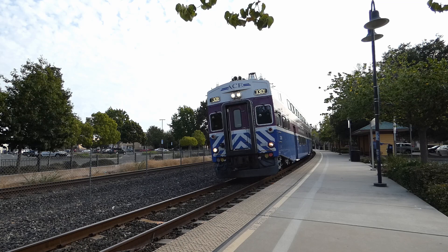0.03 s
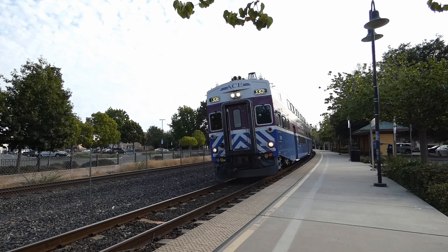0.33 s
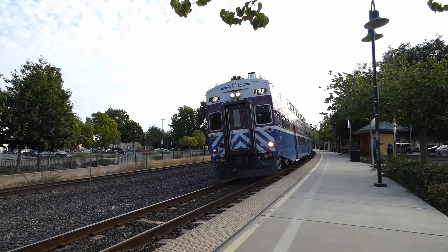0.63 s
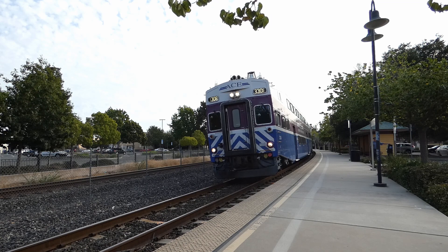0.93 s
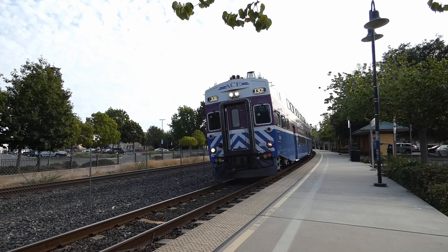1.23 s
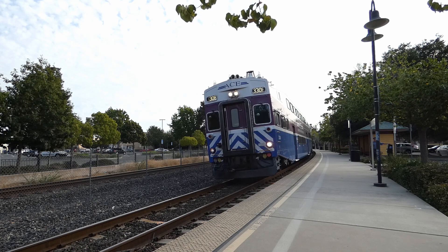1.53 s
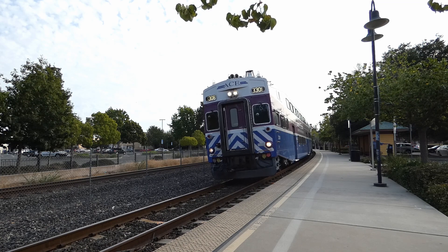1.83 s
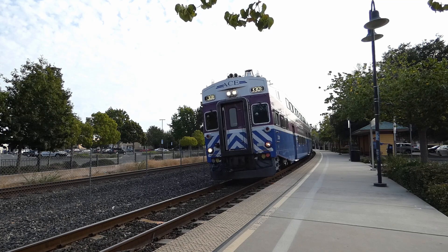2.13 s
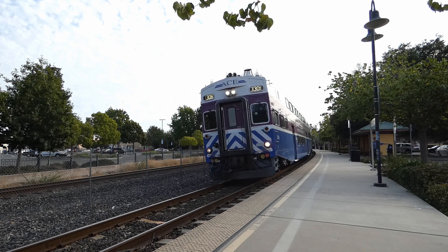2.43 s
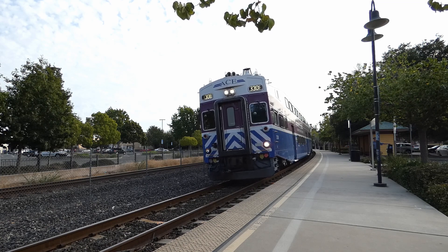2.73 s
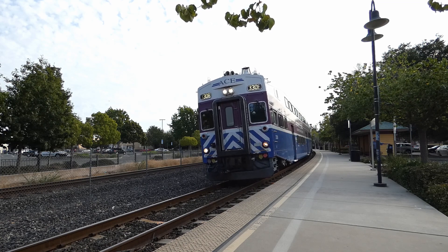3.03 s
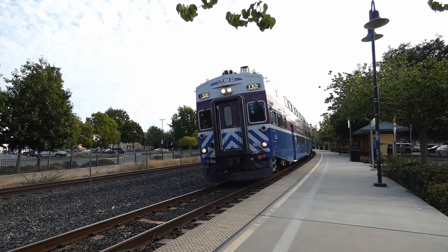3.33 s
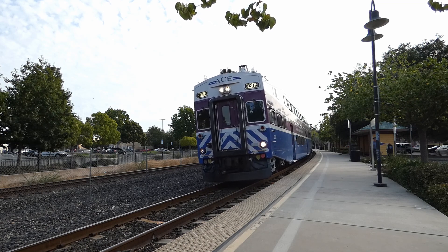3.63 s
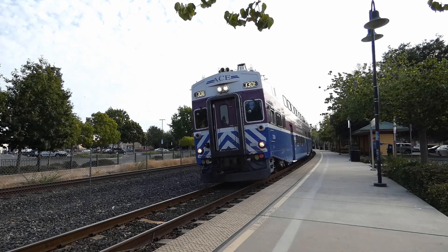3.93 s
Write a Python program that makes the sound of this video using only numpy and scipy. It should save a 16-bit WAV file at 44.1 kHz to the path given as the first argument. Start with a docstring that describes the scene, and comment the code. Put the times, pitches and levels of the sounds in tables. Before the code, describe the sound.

A train bell, already ringing, clangs at about 0.3, 1.1, 1.9 and 2.7 seconds, and the last stroke rings out. A mechanical clack and soft air puff precede each stroke. Underneath, the slow train rumbles and its engine hums as it nears an outdoor platform. Wheel hiss enters around 1.5 seconds, and faint high squeals come in from about 2.4 seconds, swelling at the end near 4 seconds.

```python
"""Slow train ringing its bell

A train rolls toward an outdoor platform. Before each bell stroke the air-driven ringer clacks,
ticks and puffs; the clapper cracks and sets beating modes going, and the last stroke rings out.
Underneath, the train rumbles, its engine hums, its wheels hiss and squeal faintly.
Gain control ducks the mix after each stroke."""
import sys
import numpy as np
from scipy import signal
from scipy.fft import rfft, irfft
from scipy.io import wavfile
from scipy.ndimage import uniform_filter1d

SR = 44100
rng = np.random.default_rng(int(sys.argv[2]) if len(sys.argv) > 2 else 0)


def to_wav(sig):
    """Store sig (one row per channel, or 1-D mono) as 16-bit WAV at the path in sys.argv[1].

    Samples outside -1..1 are clipped; the rate is SR.
    """
    pcm = np.clip(np.atleast_2d(sig), -1, 1) * 32767
    pcm = np.round(pcm).astype(np.int16)
    wavfile.write(sys.argv[1], SR, pcm.T)  # frames by channels


N = 176400
T = np.arange(N) / SR
RISE_S, KNOCK_PAN_DB = .0005, -1


def amp(db):
    """Decibels to gain."""
    return 10 ** (np.asarray(db) / 20)


def unit_rms(x):
    """Scale to rms 1."""
    return x / np.sqrt(np.mean(abs(x) ** 2) + 1e-20)


def log_interp(points, hz):
    """Interpolate on a log-frequency axis."""
    f, value = np.transpose(points)
    return np.interp(np.log(hz + 1), np.log(f + 1), value)


def level(points):
    """Gain over time from a dB curve."""
    return amp(np.interp(T, *np.transpose(points)))


def pan(db):
    """Stereo gains from left-minus-right dB."""
    return amp(np.array([[db], [-db]]) / 2)


def lag(x, tau_s):
    """One-pole low-pass."""
    pole = np.exp(-1 / (tau_s * SR))
    return signal.lfilter([1 - pole], [1, -pole], x)


def drift(rate_hz):
    """Slow random motion, rms 1."""
    f = np.fft.rfftfreq(N, 1 / SR)
    return unit_rms(irfft(rfft(rng.standard_normal(N)) * np.exp(-(f / rate_hz) ** 2), N))


def strike(start_s, t60_s):
    """Impact envelope: fast rise, exponential decay."""
    age = np.maximum(T - start_s, 0)
    return np.minimum(age / RISE_S, 1) * np.exp(-np.log(1000) * np.minimum(age / t60_s, 10))


# Left-right likeness: freq_hz, correlation
STEREO_CORRELATION = [(25, 0.5), (70, 0.73), (250, 0.88), (600, 0.79), (2000, 0.77), (6000, 0.73),
                      (13000, 0.18)]


def noise(spectrum):
    """Shaped stereo noise, rms 1."""
    f = np.fft.rfftfreq(N, 1 / SR)
    left, independent = rfft(rng.standard_normal((2, N)))
    corr = np.clip(log_interp(STEREO_CORRELATION, f), 0, 1)
    right = corr * left + np.sqrt(1 - corr ** 2) * independent
    return unit_rms(irfft(np.array([left, right]) * amp(log_interp(spectrum, f)), N))


# Clapper strokes: start_s, level_db, mode0_db, mode1_db, mode6_db, bloom_s
STROKES = [(-.485, 0, -6, 3.5, 5, .05), (0.3155, 0, -7, 4, -5.5, 0.038),
           (1.1116, -3.5, -4, 6.5, 4.5, 0.012), (1.9080, 0, -3.5, -0.5, -4, 0.16),
           (2.7078, 0, -1, -4, -7, 0.024)]
# Bell modes: pitch_hz
BELL_HZ = [1082, 2052, 2307, 3612, 3803, 5185, 5631, 5717, 6090, 7423, 7654, 8250, 9112, 9443, 9807, 9940,
           10637, 11038, 12098, 13170, 14385]
# Same modes, each a close pair: level_db, t60_s, split_hz, twin_ratio, pan_db
BELL_MODES = [(-11, 4.64, 0.8, 0.044, -1.4), (-15.5, 1.42, 6.06, 0.29, -5.5), (-7, 0.6, 4.4, -0.31, 1),
              (-34, 1.68, 1.8, -0.022, -8.5), (-15.5, 1.52, 4.43, -0.12, .1), (-30.5, 0.51, 6, .3, -9),
              (-18.5, 1.13, 1.73, -0.23, -2.5), (-29, 0.58, 7, 0.39, 3), (-28.5, 1, 11.4, 0.15, -3),
              (-23.5, 0.68, 3.2, -0.19, -0.5), (-20, 0.85, 13.27, 0.46, -2), (-38.5, 0.54, 6.5, -0.11, 4),
              (-38, 0.66, 6, 0.57, -9), (-27, .5, 8.9, 0.091, -1.4), (-24.5, 0.99, 26, 0.25, 1),
              (-35, 0.56, 10, 0.14, 2), (-33, 0.57, 8, -0.0076, -11), (-49, 0.48, 8.2, .4, 4),
              (-32.5, 0.4, 6.4, -0.094, 3), (-46, 0.37, 10, .4, 1), (-46, 0.55, 7, .4, 6)]
# Lowest mode as the train moves: time_s, gain_db
LOWEST_MODE_GAIN = [(0, -5.5), (.5, 1.5), (.9, -4), (1.5, -3), (2.3, 1), (2.85, -2), (3.15, 2), (3.65, 1.5),
                    (4, -2)]


def bell(shimmer_depth=.25, shimmer_hz=13.6, sway_depth=.15, sway_hz=2.5, brighten_db_per_s=1.15):
    """Each stroke restarts beating mode pairs; moving reflections make the upper ones shimmer."""
    start, stroke_db, *uneven_db, bloom_s = np.transpose(STROKES)
    mode_db = dict(zip((0, 1, 6), uneven_db))
    bloom_mode = 4  # swells in after the stroke
    latest = np.maximum(np.searchsorted(start, T, "right") - 1, 0)
    age = T - start[latest]
    sway = drift(sway_hz)
    out = np.zeros((2, N))
    for k, (hz, (db, t60, split_hz, twin, pan_db)) in enumerate(zip(BELL_HZ, BELL_MODES)):
        strength = amp(db + stroke_db + mode_db.get(k, 0))[latest]
        beat = 1 + twin * np.exp(2j * np.pi * split_hz * age)
        envelope = strength * np.exp(-np.log(1000) * age / t60) * beat
        height = np.sqrt(hz / BELL_HZ[bloom_mode])
        if k > bloom_mode:  # high modes grow as the train nears
            envelope *= amp(brighten_db_per_s * (start - start.mean()))[latest]
        if k == bloom_mode:
            envelope *= 1 - .98 * np.exp(-(age / bloom_s[latest]) ** 2)
        if k == 0:
            envelope *= level(LOWEST_MODE_GAIN)
        else:
            shimmer = drift(shimmer_hz * height) + 1j * drift(shimmer_hz * height)
            envelope *= 1 + shimmer_depth * height * shimmer
        tone = lag(envelope, RISE_S) * np.exp(2j * np.pi * (hz * T + rng.random()))
        side = sway_depth * height * np.roll(sway, rng.integers(N)) * tone.imag
        out += pan(pan_db) * np.array([tone.real + side, tone.real - side])
    return out


# Clapper crack spectrum: freq_hz, density_db
CRACK_SPECTRUM = [(30, -60), (200, -28), (700, -13), (1200, -9), (1700, -10), (2250, -9), (2900, -4.5),
                  (5500, -4), (9500, -2), (12500, -20), (16000, -42)]


def clapper(level_db=-16, t60_s=.097, tail_db=-15.5, tail_t60_s=.45):
    """Metal-on-metal crack at each stroke."""
    envelope = sum(amp(db) * (strike(s, t60_s) + amp(tail_db) * strike(s, tail_t60_s))
                   for s, db, *_ in STROKES)
    return pan(KNOCK_PAN_DB) * amp(level_db) * envelope * noise(CRACK_SPECTRUM)


# Piston clacks: start_s, level_db
CLACKS = [(0.0577, -2), (0.8566, -3), (1.6549, -3.5), (2.454, -2)]
# Ringer modes: pitch_hz
RINGER_HZ = [3850, 4060, 4300, 4440, 4880, 6745, 6828, 9188, 9442]
# Same modes: level_db, t60_s
RINGER_MODES = [(-22, 0.076), (-22, .15), (-41, 0.18), (-48, .12), (-34, .12), (-47, 0.1), (-20.5, 0.14),
                (-27, 0.11), (-31.5, 0.34)]
# Rattle spectrum: freq_hz, density_db
RATTLE_SPECTRUM = [(30, -60), (300, -48), (1000, -4), (1600, -3), (2500, -5.5), (3300, -6.5), (4100, 0.5),
                   (5300, -6), (6800, -1), (7800, -12), (9400, -4.5), (11500, -15.5), (15500, -20)]
# Tick spectrum: freq_hz, density_db
TICK_SPECTRUM = [(1500, -26), (4500, 4), (7000, -2), (10000, 5), (13000, -18), (16000, -32)]


def ringer(rattle_db=-20.5, bounce_s=.009, bounce_db=-3.5, tail_db=-13.5, tick_db=-33):
    """The piston clacks home, bounces, then ticks once more."""
    def clacks(t60_s, delay_s=0):
        return sum(amp(db) * strike(s + delay_s, t60_s) for s, db in CLACKS)

    modes = sum(amp(db) * clacks(t60) * np.sin(2 * np.pi * (hz * T + rng.random()))
                for hz, (db, t60) in zip(RINGER_HZ, RINGER_MODES))
    bounces = sum(amp(k * bounce_db) * clacks(t60_s=.067, delay_s=k * bounce_s) for k in range(3))
    tail = amp(tail_db) * clacks(t60_s=.25)
    rattle = amp(rattle_db) * (bounces + tail) * noise(RATTLE_SPECTRUM)
    tick = amp(tick_db) * clacks(t60_s=.093, delay_s=.097) * noise(TICK_SPECTRUM)
    return pan(KNOCK_PAN_DB) * (rattle + modes + tick)


# Drive air spectrum: freq_hz, density_db
PUFF_SPECTRUM = [(30, -48), (200, -4), (450, -4), (850, -1), (1250, 4), (1900, -16.5), (3000, -14),
                 (8000, -16), (14000, -30)]


def air_puff(level_db=-33, lead_s=.029, width_s=.046, shutoff_s=.0099):
    """Air throws the clapper: swells before each stroke, cuts off on impact."""
    envelope = np.zeros(N)
    for start, *_ in STROKES:
        swell = np.exp(-((T - start + lead_s) / width_s) ** 2 / 2)
        envelope += swell * (1 - np.clip((T - start) / shutoff_s, 0, 1))
    return pan(KNOCK_PAN_DB) * amp(level_db) * envelope * noise(PUFF_SPECTRUM)


# Rumble spectrum: freq_hz, density_db
RUMBLE_SPECTRUM = [(20, -26), (45, -28), (65, 5), (110, 4), (165, 0.5), (220, 8.5), (290, -1), (420, 2.5),
                   (600, -4), (800, -2.5), (1100, -5.5), (1500, -8.5), (2500, -17), (4500, -22),
                   (9000, -59), (15000, -92)]
# Rumble envelope: time_s, level_db
RUMBLE_LEVEL = [(0, -34.5), (.8, -34), (1.6, -35.5), (2.4, -36.5), (3.1, -36.5), (3.6, -35.5), (4, -34)]


def rumble(flutter_db=.96):
    """Low, uneven noise of the rolling train."""
    return level(RUMBLE_LEVEL) * amp(flutter_db * drift(11)) * noise(RUMBLE_SPECTRUM)


# Engine tones: pitch_hz, width_hz, level_db
HUM_TONES = [(67.4, 5, -56), (90.9, 3.96, -46), (206, 8.07, -48.5), (237, 6.14, -48.5), (352, 1.67, -41),
             (364.7, 3.37, -47), (694, 3.93, -52.5), (756.5, 19.9, -48.5)]
# Hum envelope: time_s, gain_db
HUM_GAIN = [(0, -5), (1.5, -3.5), (2.6, -3), (3.1, 2), (3.6, 2), (4, 1)]


def engine_hum(waver_db=1.5):
    """Engine tones wavering in level and pitch."""
    hum = np.zeros(N)
    for hz, width_hz, db in HUM_TONES:
        rms = amp(db + waver_db * drift(10))
        phase = 2 * np.pi * np.cumsum(hz + width_hz / 2 * drift(10.4)) / SR
        hum += rms * np.sqrt(2) * np.sin(phase)
    return level(HUM_GAIN) * hum


# Wheel hiss spectrum: freq_hz, density_db
HISS_SPECTRUM = [(1200, 2), (3000, -1), (4800, 2.5), (7200, 0.5), (10000, -1), (12500, -8), (15000, -17),
                 (16000, -26)]
# Hiss envelope: time_s, level_db
HISS_LEVEL = [(0, -60), (1.5, -56), (1.56, -42), (2.1, -40.5), (2.6, -38), (3.2, -42.5), (3.3, -36.5),
              (3.7, -37.5), (4, -41)]


def wheel_hiss(flutter_db=1):
    """Bright noise of wheels on rail."""
    return level(HISS_LEVEL) * amp(flutter_db * drift(45)) * noise(HISS_SPECTRUM)


# Wheel squeals: pitch_hz
SQUEAL_HZ = [5184, 5184, 10365, 7070, 4690, 7085, 7327, 11025, 5645, 9083]
# Same squeals: peak_s, swell_s, fade_s, level_db
SQUEALS = [(2.41, 0.15, 0.037, -41.5), (2.56, 0.065, .08, -35.5), (2.57, 0.73, 0.17, -47.5),
           (2.8, 0.44, 0.44, -50), (3.09, 0.055, 0.13, -43.5), (3.45, 0.14, 0.61, -49),
           (4.3, 0.52, 0.71, -47), (3.62, .15, 0.11, -49), (3.7, 0.82, 0.59, -47.5), (4, 0.31, 0.23, -29.5)]


def wheel_squeals(wander_hz=12.3, flutter_db=2.5, spread_rad=.26):
    """Flanges rub in the curve: single wheel modes swell, flutter and fade."""
    out = np.zeros((2, N))
    for hz, (peak_s, swell_s, fade_s, db) in zip(SQUEAL_HZ, SQUEALS):
        from_peak = np.maximum((peak_s - T) / swell_s, (T - peak_s) / fade_s)
        phase = 2 * np.pi * np.cumsum(hz + wander_hz * drift(89)) / SR
        rms = amp(db + flutter_db * drift(37)) * np.exp(-from_peak ** 1.24)
        out += rms * np.sqrt(2) * np.sin([phase, phase + spread_rad * drift(8.7)])
    return out


def station_echo(x, level_db=-18, t60_s=.61, predelay_s=.008):
    """Faint scattered echoes from platform, shelter and trees."""
    t = T[:SR]
    reflections = rng.standard_normal((2, SR)) * (rng.random((2, SR)) < .05)
    tail = reflections * (t > predelay_s) * np.exp(-np.log(1000) * t / t60_s)
    return amp(level_db) * signal.fftconvolve(x, tail / np.linalg.norm(tail[0]), axes=1)[:, :N]


def scene():
    """Bell and its echoing mechanism over the rolling train."""
    mechanism = clapper() + ringer() + air_puff()
    ringing = bell() + mechanism + station_echo(mechanism)
    return ringing + rumble() + engine_hum() + wheel_hiss() + wheel_squeals()


def record(dry):
    """Fast-attack, slow-release gain control, then soft clip and low-pass."""
    threshold_db, slope, attack_s, release_db_per_s = -24.5, .59, .0021, 20.5
    ceiling, cutoff_hz = .72, 15900
    power = uniform_filter1d((dry ** 2).mean(0), size=256, origin=127)
    over_db = np.maximum(10 * np.log10(abs(power) + 1e-12) - threshold_db, 0)
    release_db = T * release_db_per_s
    cut_db = np.maximum.accumulate(slope * over_db + release_db) - release_db
    ducked = dry * amp(-lag(cut_db, attack_s))
    clipped = ducked / (1 + (ducked / ceiling) ** 6) ** (1 / 6)
    lowpass = signal.firwin(255, cutoff_hz, window=("kaiser", 9), fs=SR)
    return signal.oaconvolve(clipped, lowpass[None], "same")


dry = scene()
out = record(dry)
to_wav(out)
```